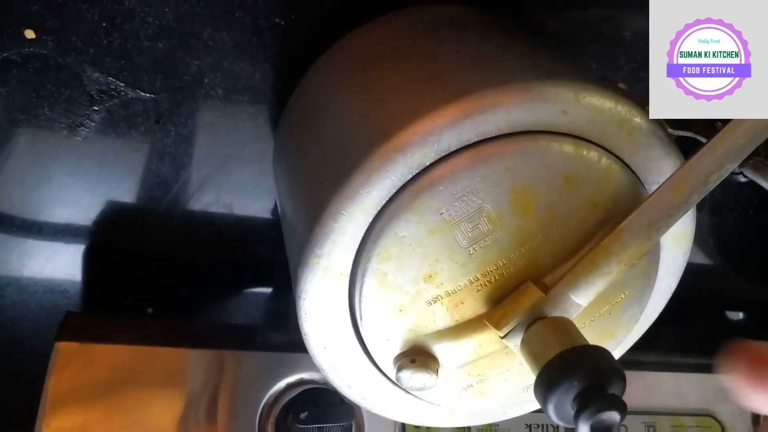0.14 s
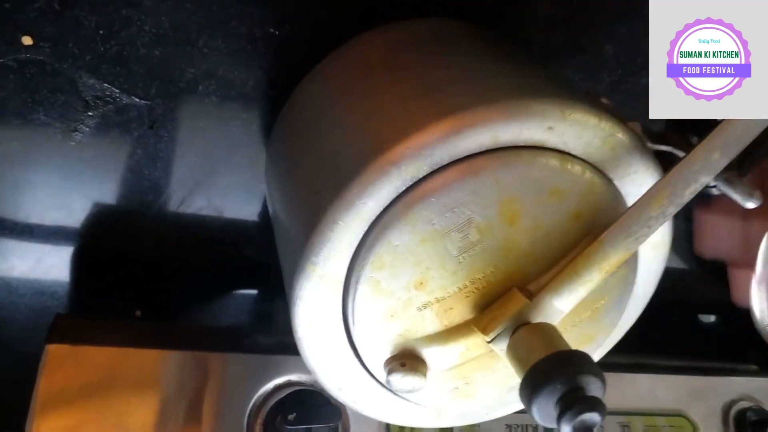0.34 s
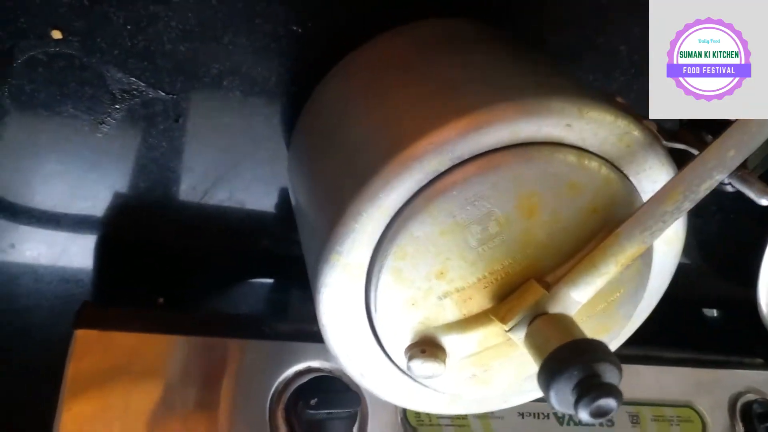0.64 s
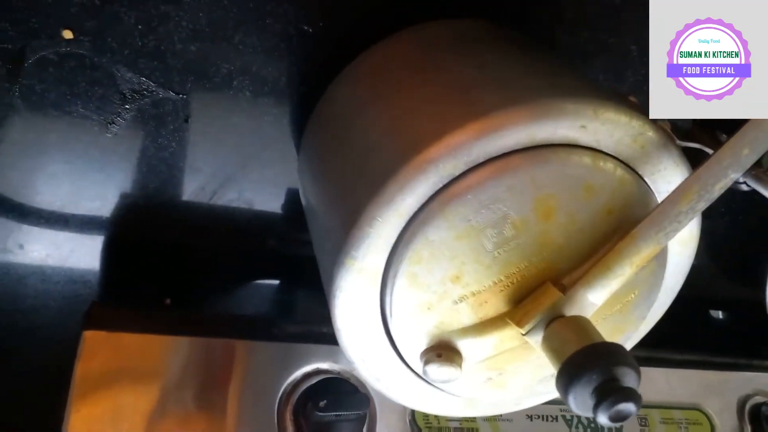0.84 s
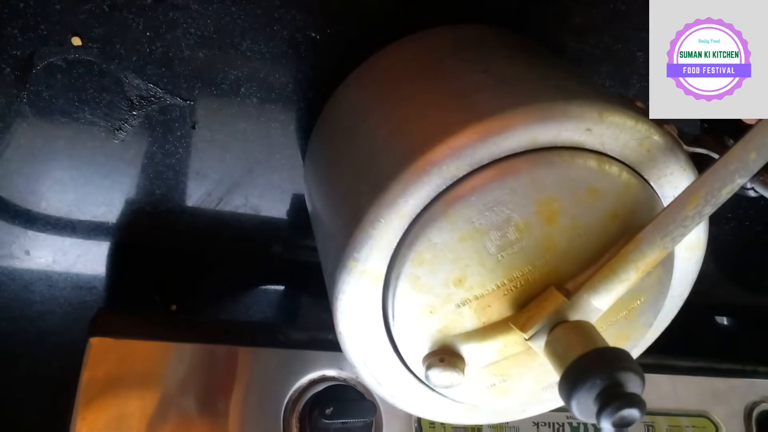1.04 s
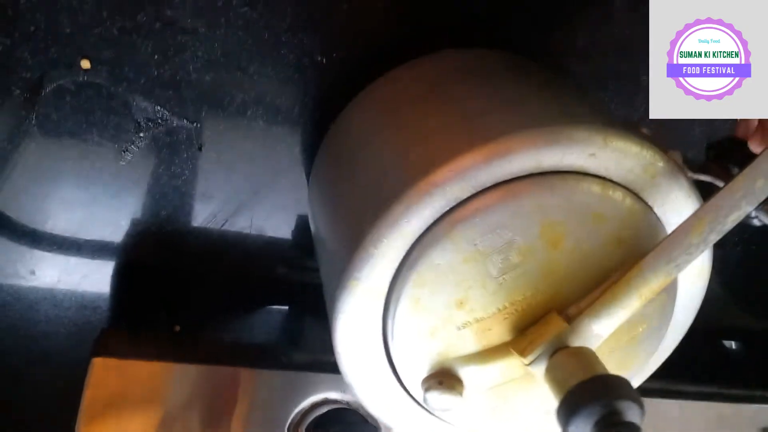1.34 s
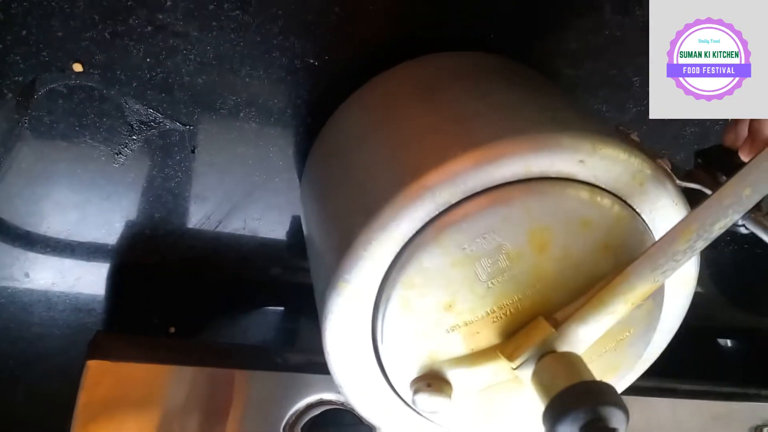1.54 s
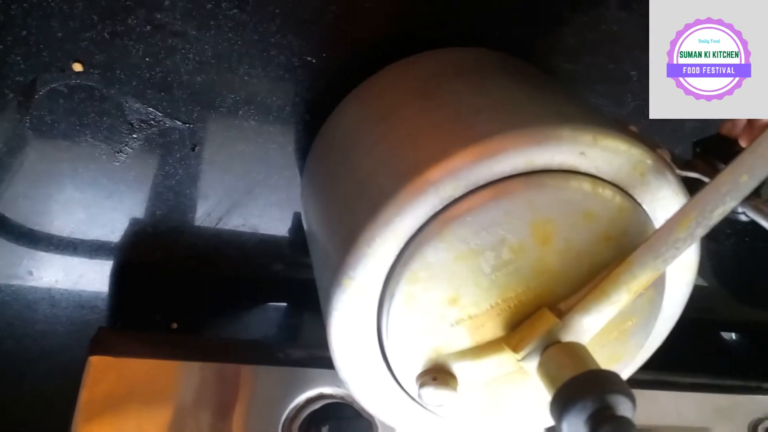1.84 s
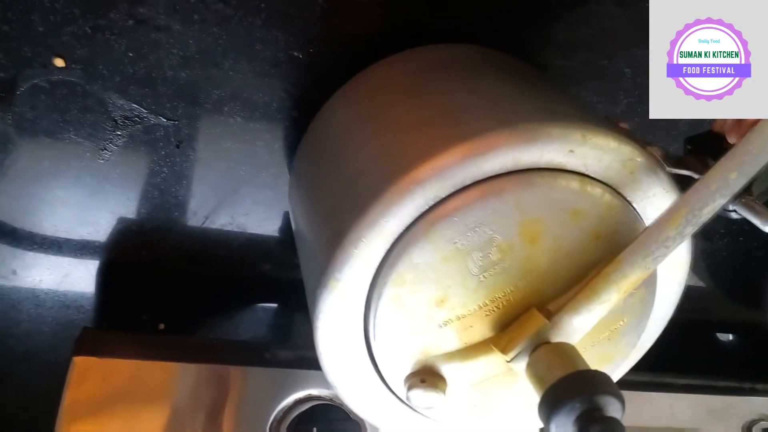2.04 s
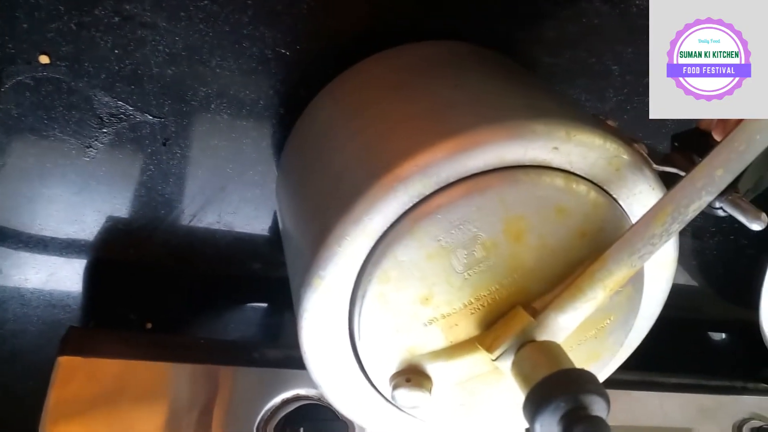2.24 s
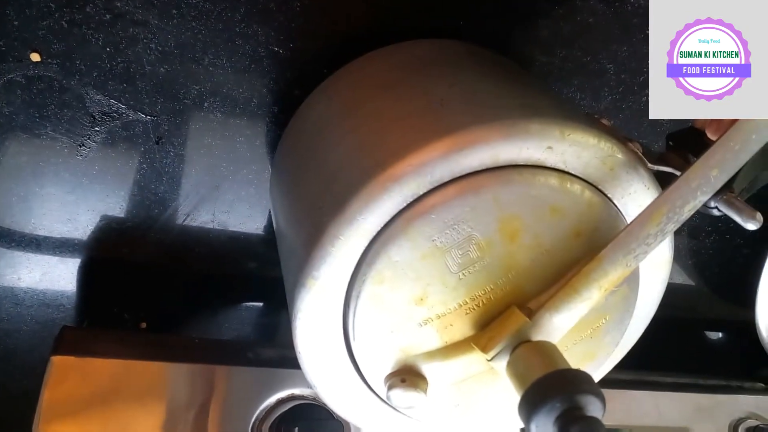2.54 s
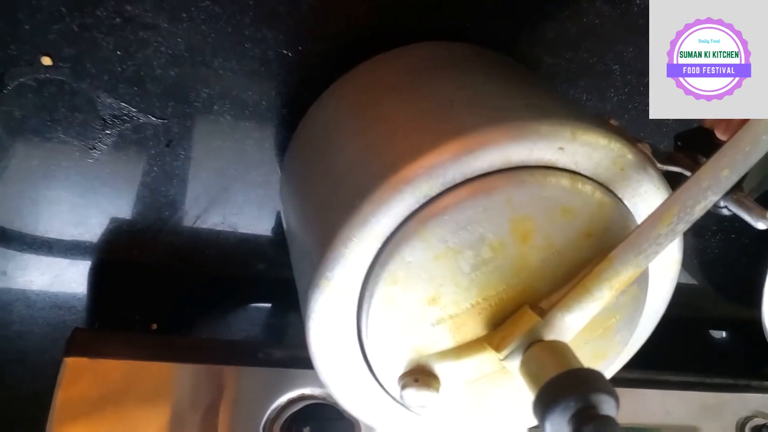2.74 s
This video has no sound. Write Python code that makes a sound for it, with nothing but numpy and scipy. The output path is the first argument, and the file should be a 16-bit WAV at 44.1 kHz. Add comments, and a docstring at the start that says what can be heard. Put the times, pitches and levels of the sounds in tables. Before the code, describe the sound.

A pressure cooker gives one short steam spurt and a clack, then hisses faintly.

```python
"""Pressure cooker in a small kitchen.

Steam jets from the vent under the tipped-up weight, which drops back with a clack and shakes the lid.
A faint leak hisses and whistles round the seat. Kitchenware is knocked twice nearby.
Short dull rumbles come in the second half; hard walls add a brief echo."""
import sys
import numpy as np
from scipy import signal
from scipy.fft import rfft, irfft
from scipy.io import wavfile

SR = 44100
rng = np.random.default_rng(int(sys.argv[2]) if len(sys.argv) > 2 else 0)


def materialize(psi):
    """Save the field psi as 16-bit PCM at rate SR to the path in sys.argv[1].

    A 1-D psi becomes a single channel; in a 2-D psi each row is a channel.
    """
    bounded = np.clip(np.atleast_2d(psi).T, -1, 1)
    quanta = np.round(bounded * 32767).astype(np.int16)
    wavfile.write(sys.argv[1], SR, quanta)


N = 127890
T = np.arange(N) / SR
CUTOFF_HZ = 15400

# Noise spectra. Each row: frequency in Hz, relative density in dB.
JET_SPECTRUM = [(100, -22.5), (300, -24.5), (700, -23), (1300, -13.5), (2100, -15), (3100, -9), (3800, -10),
                (4600, -5.5), (5300, 1.5), (5750, -2), (6150, -1.5), (6900, -5), (7350, -2.5), (7800, -14),
                (8400, -14.5), (9300, -6), (10150, -2), (11000, -9), (12600, -8.5), (13500, -2),
                (14200, -5), (15200, -5)]
LEAK_HISS_SPECTRUM = [(3000, -34), (3700, -28.5), (4300, -12), (4900, -3), (5800, 1), (6700, -1),
                      (8100, -10.5), (9800, -5.5), (11200, -6.5), (12800, -15), (15200, -14.5)]
LEAK_TOP_SPECTRUM = [(7000, -21), (9500, -10), (11000, -1.5), (12200, -2.5), (13200, -4), (14500, 2.5),
                     (15300, 0.5)]
LEAK_RUSH_SPECTRUM = [(100, -4.5), (300, -1.5), (600, -4.5), (950, 0.5), (1300, 0.5), (1900, 1),
                      (3000, -3.5), (4500, -12), (8000, -24)]
FLOOR_SPECTRUM = [(42, -2.5), (52, 2.5), (80, -1.5), (150, -7), (290, -4), (500, -17.5), (1500, -15.5),
                  (3500, -20.5), (15000, -21)]
BASS_SPECTRUM = [(40, -4.5), (52, 2.5), (80, -5), (130, 1), (300, -7), (600, -16), (2000, -52)]
LID_SPECTRUM = [(160, -9), (240, -0.5), (330, -3), (520, -10.5), (850, -0.5), (1500, -2.5), (2000, -7.5),
                (2600, -10.5), (3150, -4.5), (4300, -11), (7000, -13.5), (9000, -26.5), (15000, -28)]
CLATTER_SPECTRUM = [(120, -22), (250, -5), (450, -3.5), (620, -8), (1000, -1.5), (2000, -2), (3200, -5),
                    (4500, -10.5), (7000, -14), (15000, -60)]
TICK_SPECTRUM = [(500, -12.5), (900, 11), (1500, 2), (3500, -6), (7000, -14), (15000, -20)]

# Envelopes of leak and background bass. Each row: time in seconds, level in dB.
LEAK_HISS_ENVELOPE = [(0, -42.5), (.32, -58), (.42, -62), (.6, -61.5), (.85, -64.5), (1.05, -71.5),
                      (1.2, -67), (1.33, -59), (1.47, -62.5), (1.6, -60), (1.72, -60), (1.87, -66),
                      (2.03, -63), (2.14, -61), (2.3, -65.5), (2.58, -72), (2.8, -68), (2.9, -71.5)]
LEAK_TOP_ENVELOPE = [(0, -81.5), (1.2, -82.5), (1.36, -72.5), (1.45, -95), (1.9, -89), (2.05, -71),
                     (2.28, -64.5), (2.42, -67.5), (2.68, -68.5), (2.9, -80)]
LEAK_RUSH_ENVELOPE = [(0, -80), (.55, -78.5), (.8, -77.5), (1.03, -101), (1.24, -86), (1.35, -69),
                      (1.5, -63), (1.68, -70.5), (1.95, -56), (2.15, -60), (2.32, -56), (2.44, -70),
                      (2.6, -81), (2.82, -72), (2.9, -75)]
BASS_ENVELOPE = [(0, -59), (.3, -84.5), (1.2, -88), (1.7, -72), (1.9, -57.5), (2.4, -71), (2.9, -71.5)]

# Modes of struck parts and of the room. Each row: frequency in Hz, relative level in dB, T60 in seconds.
WEIGHT_RESONANCES = [(296.4, -31, 0.021), (892, -8, 0.014), (1190, -6.5, 0.0078), (1591, -9.5, 0.01),
                     (2580, -9.5, .005), (3140, -6.5, 0.017), (3870, -12, .004), (6500, -12, 0.0023),
                     (9500, -17, 0.00069)]
METAL_RESONANCES = [(1592, 2, 0.13), (2245, -11.5, 0.22), (3077, -6, 0.082), (3330, -25, 0.081),
                    (3762, -14.5, 0.098)]
ROOM_MODES = [(119.3, -13, 0.14), (164.5, -3.5, 0.24), (200, -7, .11), (232.3, -5.5, 0.12),
              (270.3, -5.5, 0.11), (293, -8, 0.14), (365, -22, 0.051)]
HOLLOW_RESONANCES = [(400, 0, 0.102), (571, -2, 0.053), (670, -2.5, 0.072), (950, -6, 0.053),
                     (1062, -5, .12), (1971, -2, 0.032)]

# Pipe tones of the vent. Each row: frequency in Hz, width in Hz, level in dB at unit flow.
VENT_TONES = [(5395, 23, -24), (6080, 110, -35)]
# Weight striking its seat. Each row: time in seconds, strength in dB.
WEIGHT_HITS = [(0.0763, -15.5), (.0950, 0), (0.1072, -20), (0.1114, -13.5), (0.1171, -13), (0.1208, -18.5),
               (.1525, -22.5)]
# Leak whistles. Each row: start and length in seconds, start and end pitch in Hz, level in dB,
# waver as a fraction of pitch, width in Hz.
LEAK_WHISTLES = [(.24, .15, 10100, 9860, -64, .005, 1100), (0.411, .17, 4000, 4350, -73, .01, 500),
                 (0.313, 0.092, 5380, 5280, -63.5, 0.0018, 80),
                 (0.393, 0.069, 11000, 12270, -70, 0.0061, 70), (0.457, 0.14, 8900, 8200, -74, .03, 110),
                 (0.71, 0.1, 9000, 8900, -68, 0.0056, 70), (0.77, 0.11, 9520, 9800, -69, 0.016, 70),
                 (0.775, .135, 4820, 4800, -66.5, .012, 225), (1.238, .12, 5750, 5750, -68.5, .02, 399.3),
                 (1.263, .06, 12080, 12200, -68, 0.0022, 40), (2.046, 0.054, 5600, 5730, -65.5, 0.019, 293),
                 (2.104, 0.06, 5800, 5780, -57, 0.00836, 650),
                 (2.12, 0.086, 12050, 12100, -68, 0.0043, 120), (2.145, 0.14, 5550, 5420, -67, .006, 97)]
# Blows on kitchenware. Each row: time in seconds, then clatter, metal, thud, tick and body gains in dB.
KNOCK_HITS = [(.6142, -43.5, -36, -38.5, -51.5, -71), (0.6229, -43, -66, -34.5, -54, -71),
              (.667, -52, -68, -37, -56, -71), (.694, -48.5, -59, -61, -33, -54.5),
              (.712, -70, -77, -46, -71, -82), (1.7071, -37, -52.5, -42, -44, -44),
              (1.7103, -42.5, -53, -58, -31.5, -42), (1.724, -44.5, -33.5, -31.5, -62, -43.5),
              (1.7402, -41.5, -67, -36.5, -36, -39.5), (1.761, -50, -74, -38, -66, -45.5),
              (1.787, -45.5, -70, -38.5, -66, -40)]
# Low rumbles. Each row: start and length in seconds, gain in dB, start and end centre in Hz,
# ramp in seconds.
RUMBLE_BURSTS = [(1.283, .1, -71, 276.6, 282.7, 0.026), (1.957, 0.086, -60, 150, 110, 0.043),
                 (2.204, .125, -46, 310, 181.8, .01), (2.634, 0.066, -60, 278.3, 267.6, 0.048),
                 (2.73, 0.14, -70.5, 139.2, 299, 0.016)]
# Reflections off lid, worktop and wall. Each row: delay in seconds, gain in dB.
NEAR_REFLECTIONS = [(.0013, -17.5), (.0034, -15.5), (.0061, -14.5), (.0095, -14.5)]
# Kitchen echo decay. Each row: frequency in Hz, T60 in seconds.
KITCHEN_DECAY = [(150, 0.4256), (500, 0.5777), (1500, 0.398), (4000, 0.4672), (8000, 0.26), (15000, 0.38)]


def from_db(db):
    """Decibels to gain."""
    return 10 ** (np.asarray(db) / 20)


def rms_one(x):
    """Scale to unit rms."""
    return x / np.sqrt(np.mean(x ** 2) + 1e-20)


def at_hz(points, hz):
    """Read a table on a log-frequency axis."""
    points_hz, values = np.transpose(points)
    return np.interp(np.log(hz + 0.0011), np.log(points_hz), values)


def level(envelope):
    """Gain over time from an envelope table."""
    return from_db(np.interp(T, *np.transpose(envelope)))


def drift(bandwidth_hz):
    """Random wander, unit rms."""
    hz = np.fft.rfftfreq(N, 1 / SR)
    return rms_one(irfft(rfft(rng.standard_normal(N)) / (1 + (hz / bandwidth_hz) ** 2), N))


def noise(spectrum):
    """Coloured noise, unit rms, rolled off below its lowest point."""
    hz = np.fft.rfftfreq(N, 1 / SR)
    rolloff = np.minimum(hz / spectrum[0][0], 1) ** 2
    gain = from_db(at_hz(spectrum, hz)) * rolloff * (hz < CUTOFF_HZ)
    return rms_one(irfft(rfft(rng.standard_normal(N)) * gain, N))


def narrow_noise(hz, width_hz):
    """Noise band round a fixed or moving centre, unit rms."""
    phase = 2 * np.pi * np.cumsum(np.broadcast_to(hz, N)) / SR
    return rms_one(drift(width_hz / 2) * np.cos(phase) + drift(width_hz / 2) * np.sin(phase))


def gate(start_s, length_s, ramp_s):
    """Linear rise, hold, fall; the fall begins after length_s."""
    rise = np.clip((T - start_s) / ramp_s, 0, 1)
    fall = np.clip((start_s + length_s + ramp_s - T) / ramp_s, 0, 1)
    return rise * fall


def clicks(times_s, db):
    """One impulse per blow."""
    out = np.zeros(N)
    np.add.at(out, (np.asarray(times_s) * SR).astype(int), from_db(db))
    return out


def ring(x, hz, t60_s):
    """Resonator: a unit click starts a decaying unit sine."""
    radius = from_db(-60 / (t60_s * SR))
    step_rad = 2 * np.pi * hz / SR
    return signal.lfilter([0, np.sin(step_rad)], [1, -2 * radius * np.cos(step_rad), radius ** 2],
                          x + 1e-18)


def decay(x, t60_s):
    """Exponential envelope after each click."""
    return signal.lfilter([1], [1, -from_db(-60 / (t60_s * SR))], x + 1e-18)


def jet(close_s=0.084, sag_db_per_s=25, shutoff_db_per_s=897, flutter_db=0.78, hiss_db=-20.5):
    """Steam rushes through the vent until the weight cuts it off. Returns hiss and pipe tones."""
    sag_db = sag_db_per_s * (close_s / 2 - T)
    shutoff_db = shutoff_db_per_s * np.maximum(T - close_s, 0)
    flow = from_db(flutter_db * drift(120) + sag_db - shutoff_db)
    tones = sum(from_db(db) * rms_one(np.tanh(narrow_noise(hz, width_hz)))
                for hz, width_hz, db in VENT_TONES)
    return flow * from_db(hiss_db) * noise(JET_SPECTRUM), flow * tones


def leak(flutter_db=1.0):
    """Steam seeps round the weight: hiss, thin top and lower rush, slightly unsteady."""
    hiss = level(LEAK_HISS_ENVELOPE) * noise(LEAK_HISS_SPECTRUM)
    top = level(LEAK_TOP_ENVELOPE) * noise(LEAK_TOP_SPECTRUM)
    rush = level(LEAK_RUSH_ENVELOPE) * noise(LEAK_RUSH_SPECTRUM)
    return (hiss + top + rush) * from_db(flutter_db * drift(40))


def background(floor_db=-78):
    """Steady room noise and a deep rumble that fades and swells."""
    return from_db(floor_db) * noise(FLOOR_SPECTRUM) + level(BASS_ENVELOPE) * noise(BASS_SPECTRUM)


def weight(low_cut_hz=170):
    """The weight lands on the vent and rattles, with no bass below its lowest ring."""
    hits = clicks(*np.transpose(WEIGHT_HITS))
    rings = sum((-1) ** k * from_db(db) * ring(hits, hz, t60_s)
                for k, (hz, db, t60_s) in enumerate(WEIGHT_RESONANCES))
    return signal.sosfilt(signal.butter(2, low_cut_hz, "high", fs=SR, output="sos"), rings)


def lid(gain_db=-23, t60_s=0.16):
    """The thin lid rings densely after each clack; the hits add in energy."""
    energy = decay(clicks(*np.transpose(WEIGHT_HITS)) ** 2, t60_s / 2)
    return from_db(gain_db) * noise(LID_SPECTRUM) * np.sqrt(energy)


def whistles():
    """The narrow gap sings in short wavering tones, some thin, some hissy."""
    out = 0
    for start_s, length_s, start_hz, end_hz, db, waver, width_hz in LEAK_WHISTLES:
        glide_hz = np.interp(T, [start_s, start_s + length_s], [start_hz, end_hz])
        pitch_hz = glide_hz * (1 + waver * drift(29.2))
        envelope = from_db(db) * gate(start_s, length_s - 0.01, ramp_s=0.0059)
        out += envelope * narrow_noise(pitch_hz, width_hz)
    return out


def knocks():
    """Struck kitchenware: clatter, tick, metal ring, low room boom and hollow body note."""
    times_s, clatter_db, metal_db, thud_db, tick_db, body_db = np.transpose(KNOCK_HITS)
    out = noise(CLATTER_SPECTRUM) * decay(clicks(times_s, clatter_db), t60_s=0.075)
    out += noise(TICK_SPECTRUM) * decay(clicks(times_s, tick_db), t60_s=0.02)
    parts = [(METAL_RESONANCES, metal_db), (ROOM_MODES, thud_db), (HOLLOW_RESONANCES, body_db)]
    for modes, blow_db in parts:
        for k, (hz, mode_db, t60_s) in enumerate(modes):
            scatter_db = rng.normal(0, 1, len(times_s))
            hits = clicks(times_s, blow_db + mode_db + scatter_db)
            out += (-1) ** k * ring(hits, hz, t60_s)
    return out


def rumbles(width_hz=196, band_hz=(90, 500)):
    """Short dull rumbles, the loudest sinking in pitch."""
    out = 0
    for start_s, length_s, db, start_hz, end_hz, ramp_s in RUMBLE_BURSTS:
        centre_hz = np.interp(T, [start_s, start_s + length_s], [start_hz, end_hz])
        shudder = rms_one(np.tanh(narrow_noise(centre_hz, width_hz)))
        out += from_db(db) * gate(start_s, length_s, ramp_s) * shudder
    return signal.sosfilt(signal.butter(2, band_hz, "band", fs=SR, output="sos"), out)


def near_reflections(x):
    """Near surfaces comb the hiss; power is preserved."""
    copies = sum(from_db(db) * np.pad(x, (int(delay_s * SR), 0))[:N] for delay_s, db in NEAR_REFLECTIONS)
    power_gain = 1 + sum(from_db(db) ** 2 for _, db in NEAR_REFLECTIONS)
    return (x + copies) / np.sqrt(power_gain)


def kitchen_echo(x, predelay_s=0.0052):
    """Diffuse echo of hard walls in octave bands; treble dies first."""
    hz, time_s = np.fft.rfftfreq(SR, 1 / SR), np.arange(SR) / SR
    white = rfft(rng.standard_normal(SR))
    centres_hz = np.geomspace(125, 16000, 8)
    tail = 0
    for centre_hz, share in zip(centres_hz, np.eye(len(centres_hz))):
        band = irfft(white * at_hz(np.c_[centres_hz, share], hz), SR)
        tail += band * from_db(-60 * time_s / at_hz(KITCHEN_DECAY, centre_hz))
    tail *= time_s > predelay_s
    return signal.fftconvolve(x, tail / np.linalg.norm(tail))[:N]


def scene():
    """Mono mix with kitchen echo; whistles and background stay dry."""
    jet_hiss, pipe_tones = jet()
    # Each pair: signal, echo send in dB.
    sources = [(near_reflections(jet_hiss), -11.5), (pipe_tones, -21), (near_reflections(leak()), -14.5),
               (weight(), -18), (lid(), -8), (knocks(), -7), (rumbles(), -7.5)]
    direct = sum(x for x, _ in sources)
    echo = kitchen_echo(sum(from_db(send_db) * x for x, send_db in sources))
    return (direct + echo + whistles() + background())[None]


def record(dry, low_cut_hz=42):
    """Microphone bass roll-off and a steep top cut."""
    thinned = signal.sosfilt(signal.butter(3, low_cut_hz, "high", fs=SR, output="sos"), dry)
    return signal.sosfilt(signal.ellip(12, 0.2, 80, CUTOFF_HZ, fs=SR, output="sos"), thinned)


dry = scene()
out = record(dry)
materialize(out)
```